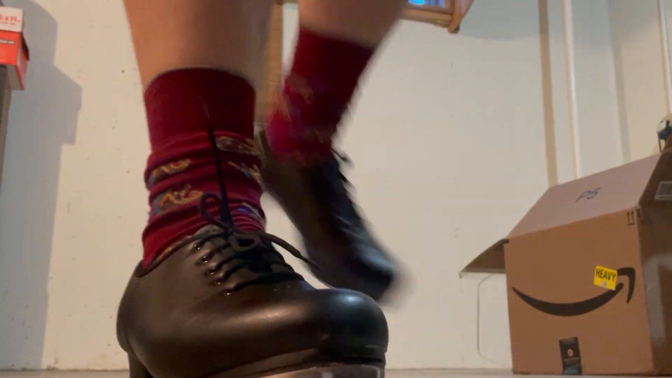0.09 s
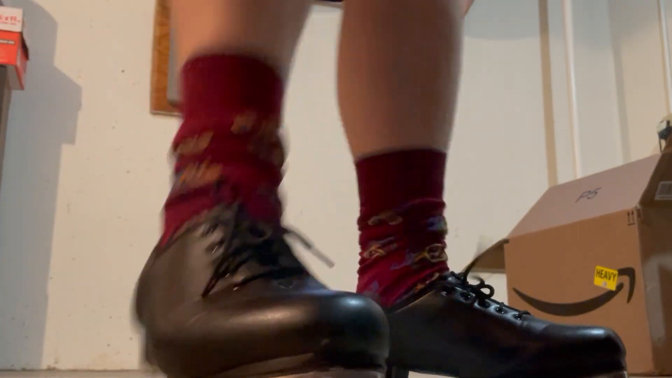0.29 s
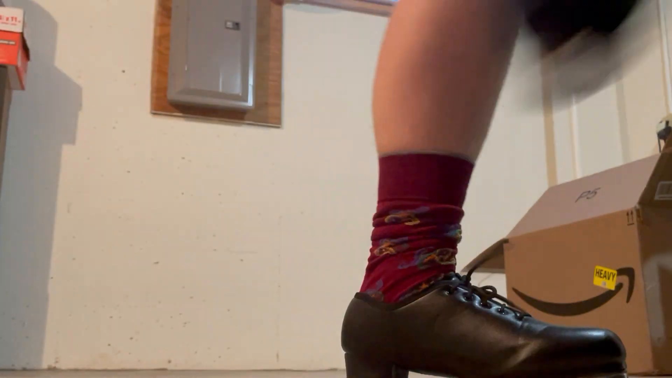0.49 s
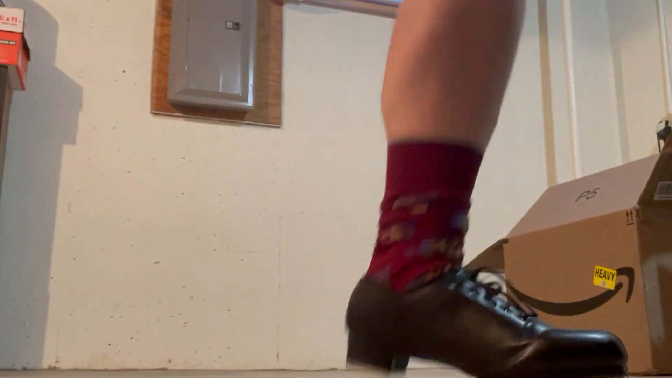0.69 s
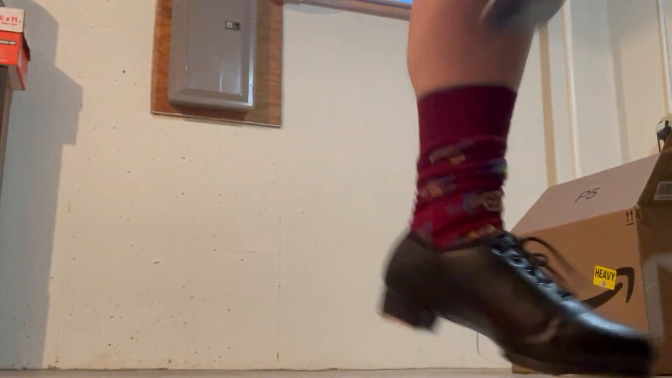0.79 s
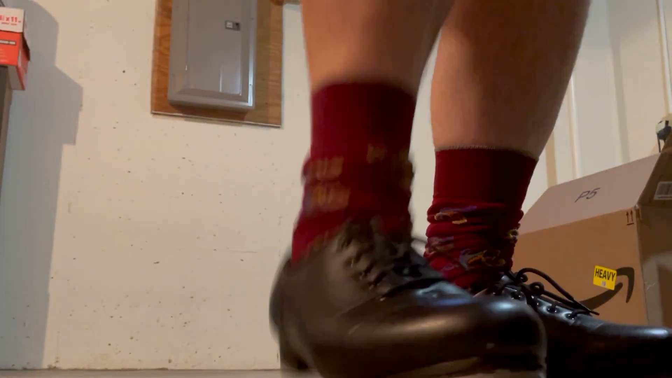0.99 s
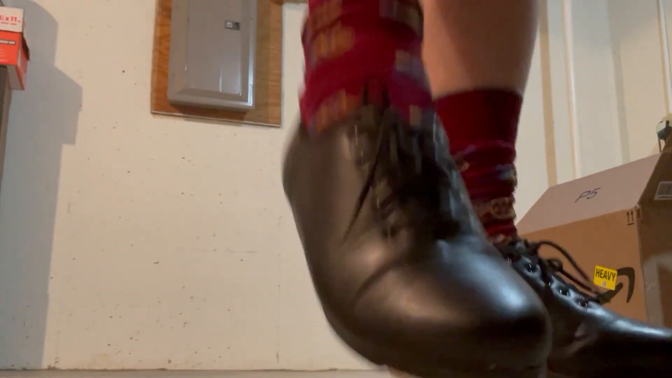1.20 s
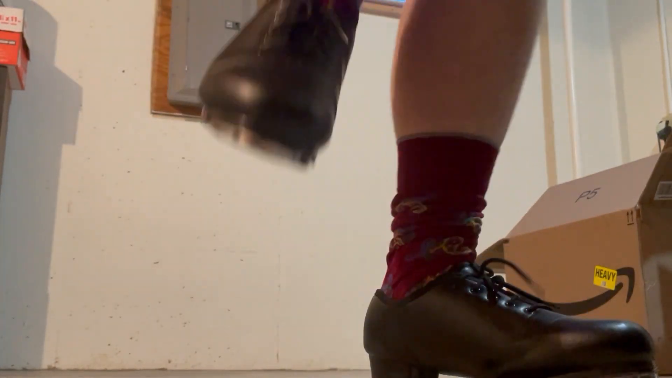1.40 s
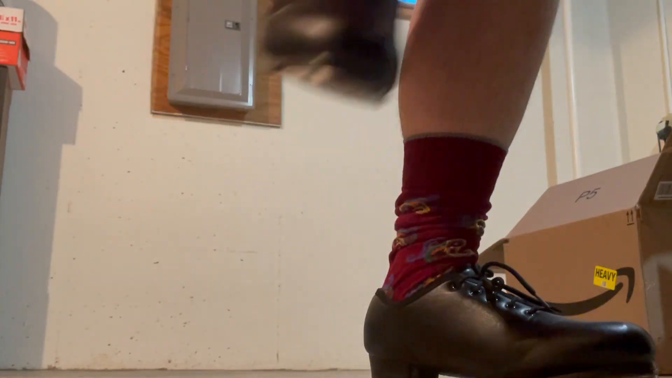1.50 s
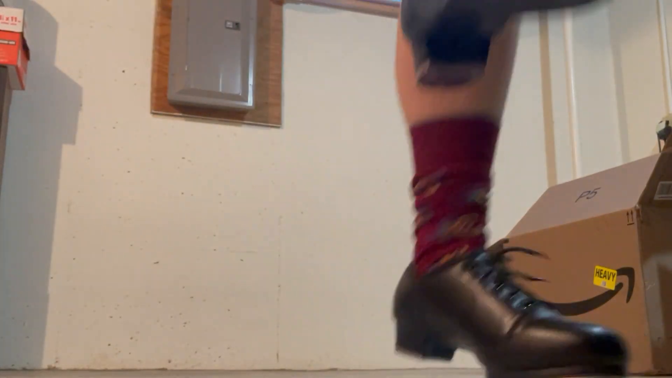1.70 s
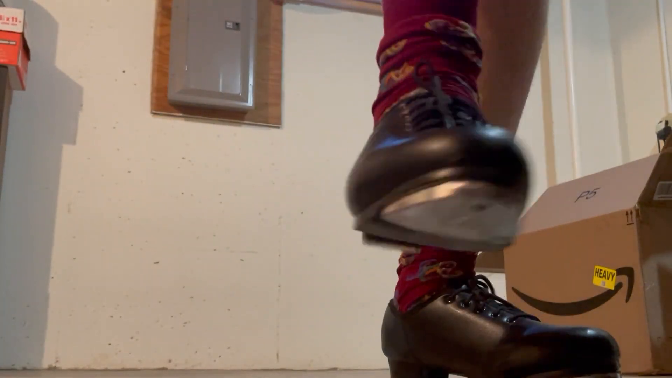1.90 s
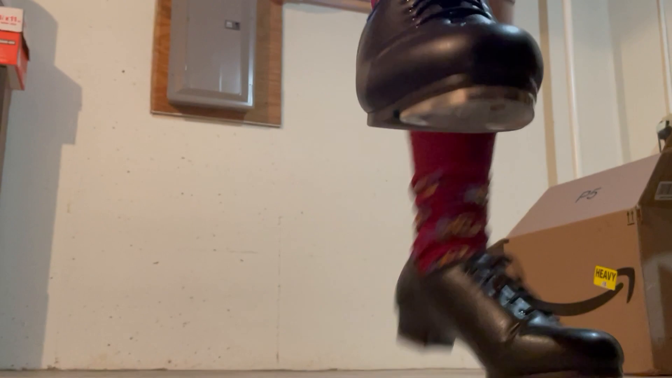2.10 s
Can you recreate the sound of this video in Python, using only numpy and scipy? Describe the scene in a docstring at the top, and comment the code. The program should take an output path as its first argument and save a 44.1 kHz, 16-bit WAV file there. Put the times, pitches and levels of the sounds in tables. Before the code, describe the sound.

A metal-tapped dance shoe hits a hard floor close to the microphone: a quick double knock, a pause, then more clacks with gritty scrapes between. A bare room rings briefly after each; faint background air.

```python
"""Tap shoe on a basement floor

Steel taps under a dance shoe knock, bounce and scrape on a hard floor near a phone lying on it.
Each contact rings the short tones of tap and sole and thuds the slab; faint shuffles fill some gaps.
The bare room answers after a gap with fading noise, and its lowest tones hum on.
The phone's two ports drift apart in phase towards the treble."""
import sys
import numpy as np
from scipy import signal
from scipy.fft import rfft, irfft
from scipy.io import wavfile
from scipy.ndimage import uniform_filter1d

SR = 44100
rng = np.random.default_rng(int(sys.argv[2]) if len(sys.argv) > 2 else 0)


def generate_wav(signal):
    """Clip the signal to [-1, 1] and save it as 16-bit WAV at the path in sys.argv[1]."""
    frames = np.transpose(np.atleast_2d(signal))
    scaled = np.clip(frames, -1, 1) * 32767
    pcm = np.round(scaled).astype(np.int16)
    wavfile.write(sys.argv[1], SR, pcm)


def elevation(decibels):
    """Turn decibel levels (scalar or array-like) into linear amplitude ratios."""
    levels = np.asarray(decibels, float)
    return 10 ** (levels / 20)


N = 92610
FREQ = np.fft.rfftfreq(N, 1 / SR) + 1e-3  # Hz, just above zero so that its logarithm exists

# natural tones (modes) of tap and sole: [f/Hz, relative level/dB, time to fall by 60 dB t60/s]
SHOE_MODES = [(660, -7.5, 0.0064), (922, -28.5, 0.009), (1200, 1.5, 0.013), (1454, -2.5, 0.016),
              (1890, -5, 0.0085), (2100, -15, 0.022), (2273, 2.5, 0.0071), (2848, 5.5, 0.0074),
              (3500, 8, 0.0068), (4080, 5, 0.013), (4866, 1.5, 0.0093), (5390, 5, 0.0039),
              (7780, 4.5, 0.0035)]
# colour of the bright crack and of the grit hiss: [f/Hz, relative level/dB]
BRIGHT_COLOUR = [(1500, -4.5), (4000, 1), (7000, 6), (10500, -1.5), (13000, -8.5), (15000, -2.5),
                 (16000, -19), (16600, -38)]
FAR_MODES_DB = -15  # share that every shoe mode gets, however far from the contact's centre
CLICK_FROM_HZ = 375  # shoe sounds are thinned out below this


def ring(hz, t60, t):
    """A struck tone: a sine that falls by 60 dB in t60 seconds."""
    return np.sin(2 * np.pi * hz * t) * np.exp(-np.log(1000) * t / t60)


def table(rows, log=True):
    """Reads a table of (Hz, value) at every frequency bin, on a logarithmic pitch scale if log is set."""
    hz, value = np.array(rows, float).T
    if log:
        return np.interp(np.log(FREQ), np.log(hz + 1), value)
    return np.interp(FREQ, hz, value)


def coloured(rows):
    """Noise of rms 1 whose spectrum follows a table of (Hz, dB)."""
    spectrum = rfft(rng.standard_normal(N)) * elevation(table(rows))
    noise = irfft(spectrum, N)
    return noise / np.std(noise)


def curve(rows, col, outside):
    """Reads one column of a time table at every sample, with a fixed value before and after it."""
    rows = np.array(rows, float)
    return np.interp(np.arange(N) / SR, rows[:, 0], rows[:, col], left=outside, right=outside)


def remove_bass(x):
    """Takes away the part below the clicks with a high-pass filter."""
    return signal.sosfilt(signal.butter(2, CLICK_FROM_HZ, "high", fs=SR, output="sos"), x)


def still_air():
    """Steady faint noise, mostly alike in both channels, with a smaller part of opposite sign."""
    # colour of the background: [f/Hz, relative level/dB]
    air_colour = [(24, -28.5), (40, 0), (112, -4), (181, -21), (461, -10.5), (782, -25), (1840, -12.5),
                  (2040, -8), (2490, -21), (15300, -26.5), (16500, -35)]
    alike = coloured(air_colour)
    opposite = 0.35 * coloured(air_colour) * np.array([[1], [-1]])
    return elevation(-65) * (alike + opposite)


def shuffles():
    """Soft shuffles of cloth and weight: faint noise rustle, with a dull low noise as weight shifts."""
    # one list per shuffle: [t/s, relative level/dB, low part against the rustle/dB]
    shuffle_curves = [
        [(0.0, -57, -38), (0.03, -55, -25), (0.05, -63, -9), (0.076, -61.5, -31.5), (0.086, -68, -8),
         (0.134, -73, 8.5), (0.15, -92, 20), (0.2, -84, 22.5)],
        [(0.64, -78, 3), (0.688, -71, -21), (0.694, -63, -5.5), (0.726, -66.5, -38), (0.754, -76, -18),
         (0.768, -87, 19), (0.79, -55, 3.5), (0.86, -61, -16)],
        [(1.56, -102, -15), (1.598, -52.5, -46.5), (1.61, -82.5, -18), (1.636, -75.5, -21), (1.654, -66, -23),
         (1.664, -67, -10), (1.68, -52, -0.5)],
    ]
    # colour of the rustle: [f/Hz, relative level/dB]
    rustle_colour = [(300, 30), (800, -17.5), (1200, -25.5), (2300, 21.5), (4000, 10), (7000, -25),
                     (11000, -26), (15500, -26), (16400, -36)]
    # colour of the low part: [f/Hz, relative level/dB]
    low_colour = [(60, -9), (120, -3), (220, 0), (400, 2.5), (700, -9), (1500, -37)]
    rustle, low = coloured(rustle_colour), coloured(low_colour)
    out = np.zeros(N)
    for rows in shuffle_curves:
        loudness = elevation(curve(rows, 1, outside=-200) - 3.5)
        low_share = elevation(curve(rows, 2, outside=-200))
        out += loudness * (rustle + low_share * low)
    return out


def contacts(rows):
    """Brief chatter rings shoe modes near a centre, plus crack and slab thud; row two goes to the walls."""
    chatter_s, crack_s, crack_level_db = .00012, 0.0013, -11.5
    scatter_db, detune = 2.2, .015  # chance spread of mode level, and of mode pitch as a fraction
    thud_hz, thud_t60_s, thud_level_db = 356.4, 0.0056, 1
    echo_ring_share = .25  # modes sent to the walls ring for this fraction of their time
    out = np.zeros((2, N + SR))
    t = np.arange(SR // 20) / SR
    hz, db, t60 = np.array(SHOE_MODES, float).T[:, :, None]
    sign = (-1.) ** np.arange(len(SHOE_MODES))[:, None]  # neighbouring modes start in opposite directions
    hiss = coloured(BRIGHT_COLOUR)
    for at, contact_db, centre_hz, octaves, thud_db, crack_db, echo_db in rows:
        i = int(at * SR)
        level_chance, pitch_chance = rng.standard_normal((2, len(SHOE_MODES), 1))
        chatter = (1 + rng.standard_normal(len(t))) * np.exp(-t / chatter_s)
        distance = np.log2(hz / centre_hz) / max(octaves, .1)
        near = elevation(FAR_MODES_DB) + np.exp(-.5 * distance ** 2)
        strength = sign * near * elevation(db + scatter_db * level_chance)
        mode_hz = hz * (1 + detune * pitch_chance)
        crack = elevation(crack_level_db + crack_db) * np.resize(hiss[i:], len(t)) * np.exp(-t / crack_s)
        for k, share in enumerate((1, echo_ring_share)):
            body = np.sum(strength * ring(mode_hz, t60 * share, t), axis=0)
            click = remove_bass(signal.fftconvolve(body, chatter)[:len(t)])
            click *= 0.067 / np.sqrt(np.mean(click ** 2))  # same rms for every click before its own level
            out[k, i:i + len(t)] += elevation(contact_db + k * echo_db) * (click + crack)
        thud = ring(thud_hz, thud_t60_s, t)
        out[0, i:i + len(t)] += elevation(contact_db + thud_db + thud_level_db) * thud
    return out[:, :N]


def room(x):
    """The room's answer: a noise tail builds after a gap and dies band by band, with early wall echoes."""
    # the tail by band: [f/Hz, t60/s, relative level/dB, share of opposite sign in left and right]
    tail_bands = [(88, 0.39, -8, 0.16), (167, 0.52, -6.5, 0.27), (378, 0.59, -9.5, 1),
                  (690, 0.51, -11.5, 0.19), (1400, 0.53, -3, 0.82), (2800, 0.49, -5, 0.25),
                  (4500, 0.43, -6, 0.21), (7560, 0.34, -3, 0.13), (10450, 0.27, -7.5, 0.28),
                  (15000, .18, -14, 0.21)]
    # first strong reflections: [delay/s, level/dB]
    wall_echoes = [(0.0149, -16.5), (0.0215, -18.5), (0.036, -22)]
    gap_s, build_s, tail_db, echo_smear_s = .005, .008, -2, 0.0035
    t = np.arange(N) / SR
    late = np.maximum(t - gap_s, 0)
    centres = np.log([row[0] for row in tail_bands])
    tail = np.zeros((2, N))
    for k, (hz, t60, db, unlike) in enumerate(tail_bands):
        # each band fades into its neighbours
        band = np.interp(np.log(FREQ), centres, np.arange(len(tail_bands)) == k) ** .5
        same, other = irfft(rfft(rng.standard_normal((2, N))) * band, N)
        build = 1 - np.exp(-late / build_s)
        decay = np.exp(-np.log(1000) * late / t60)
        shape = build * decay * np.sqrt(14 / t60 / SR)  # the root evens out short and long tails
        tail += elevation(db + tail_db) * shape * (same + unlike * other * np.array([[1], [-1]]))
    for delay_s, db in wall_echoes:
        after = np.maximum(t - delay_s, 0)
        smear = rng.standard_normal(N) * np.exp(-after / echo_smear_s) * (after > 0)
        tail += elevation(db) * smear / np.sqrt(np.sum(smear ** 2))
    return signal.fftconvolve(x[None], tail, axes=1)[:, :N]


def boom():
    """Landings set low room modes ringing with a soft start; row two is their dull push on the air."""
    # lowest room modes: [f/Hz, relative level/dB, t60/s]
    room_modes = [(49.7, -35.5, 0.28), (66.1, -39.5, 0.56), (58, -46.5, 1.75), (138.8, -41.5, .3),
                  (279.3, -51, .7)]
    # heavy landings: [t/s, level of modes one to three/dB, of mode four/dB, of mode five/dB, push/dB]
    landings = [(.243, -5.5, 6, 3.5, -15.5), (0.889, -10, -8, 5, -26), (0.975, -12, -26, -18, -31),
                (1.303, 0.5, 2, -14.5, -25), (1.761, 5.5, 5, -22, -16)]
    push_s, swell_s = 0.00092, 0.0086  # time to the push's peak, and of the soft start
    out = np.zeros((2, N))
    for at, hum_db, fourth_db, fifth_db, push_db in landings:
        t = np.maximum(np.arange(N) / SR - at, 0)
        swell = 1 - np.exp(-t / swell_s)
        blows_db = (hum_db, hum_db, hum_db, fourth_db, fifth_db)
        for k, ((hz, db, t60), blow_db) in enumerate(zip(room_modes, blows_db)):
            out[0] += (-1) ** k * elevation(db + blow_db) * ring(hz, t60, t) * swell
        out[1] += elevation(push_db) * t / push_s * np.exp(1 - t / push_s)
    return out


def slides():
    """The sole slides over grit: dense clicks ring shoe modes near a moving centre, with a bright hiss."""
    # one list per slide: [t/s, relative level/dB, centre of the ringing modes f/Hz]
    slide_curves = [
        [(.955, -52, 3070), (.965, -38, 3000), (.973, -16, 3000)],
        [(.983, -30.5, 3500), (1.089, -44, 3100), (1.113, -42.5, 3100), (1.191, -44, 2800), (1.225, -55, 2960)],
        [(1.228, -49, 2100), (1.246, -29.5, 1830), (1.262, -29, 1240), (1.278, -32.5, 1710), (1.29, -51, 2000)],
        [(1.68, -53.5, 1800), (1.708, -34.5, 1500), (1.728, -31.5, 1400), (1.752, -26, 1200)],
    ]
    slide_db, hiss_db = -8.5, -2.5
    grit_per_s, grit_spread_db, spread_octaves = 2200, 3.5, 0.6
    t = np.arange(SR // 20) / SR
    grain = uniform_filter1d(rng.exponential(size=N) ** 2, size=40)  # makes the hiss uneven
    out = elevation(hiss_db) * coloured(BRIGHT_COLOUR) * grain / np.sqrt(np.mean(grain ** 2))
    loudness = sum(elevation(curve(rows, 1, outside=-200) + slide_db) for rows in slide_curves)
    all_rows = [row for rows in slide_curves for row in rows]
    centre_hz = curve(all_rows, 2, outside=3000)
    for hz, db, t60 in SHOE_MODES:
        hits = rng.random(N) < grit_per_s / SR
        grit = hits * rng.standard_normal(N) * elevation(grit_spread_db * rng.standard_normal(N))
        rung = signal.fftconvolve(grit, ring(hz, t60, t))[:N]
        distance = np.log2(hz / centre_hz) / spread_octaves
        near = elevation(FAR_MODES_DB) + np.exp(-.5 * distance ** 2)
        out += near * elevation(db) * rung / np.std(rung) / 2
    return remove_bass(out) * uniform_filter1d(loudness, size=200)


def scene():
    """Adds up the shoe, its grit and shuffles, the room's answer and hum, and the still air."""
    # contacts of tap on floor: [t/s, relative level/dB, centre of the ringing modes f/Hz, spread/octaves,
    # thud against the contact/dB, crack against the click/dB, part sent to the walls against the contact/dB]
    taps = [(.2294, -4, 1077, 1.3, -40, 1, -1), (.2325, -12.5, 1000, 0.72, -17.5, -1, -5),
            (.2370, -16.5, 1200, 0.39, -10.5, -12, -13.5), (.2412, -1, 2080, 0.5, -10, 2.5, -3),
            (.2427, -7, 1300, 0.39, -10, 2, -3), (.2440, -2.5, 4024, 0.34, -21, 3, 6),
            (.2510, -11.5, 4114, 0.88, -12, 2, -15), (.2545, -13.5, 4500, .8, -23, 4, -6),
            (.8757, -17, 3980, 1.1, -29, -7, -12), (.8821, 3, 4080, 0.13, -32, -6, -3),
            (.8860, -5, 2370, 0.55, -23, 1, -2), (.8880, -14.5, 1200, 1, -0.5, -17.5, 3.5),
            (.9743, -8, 3500, 0.47, -10, 5.5, -24), (.9762, -9.5, 1100, 1.34, 3.5, -4, -22),
            (.9783, -13.5, 3050, 0.33, -45, -5.5, 9), (.9913, -14, 5150, 0.69, -19, 4, -11),
            (1.0347, -15, 3500, 0.37, -32, 2, -8), (1.3012, -6, 3056, 0.35, -45, 2.5, 3.5),
            (1.3042, -9.5, 1200, 0.79, -17, 3.5, -4.5), (1.7597, -2, 1200, 0.55, -20.5, 2, -23),
            (1.7622, -3.5, 2200, 1.6, -29, 2.5, 5.5)]
    # faint ticks of a loose tap or leather, with the same columns: [t/s, relative level/dB, centre f/Hz,
    # spread/octaves, thud/dB, crack/dB, part sent to the walls/dB]
    ticks = [(0.104, -46, 1050, 0.67, -29, -6, 9.5), (0.126, -42.5, 1170, 0.43, -23, -7, -17),
             (0.662, -62, 2090, 1.46, -34, 8, 6), (0.698, -42.5, 2730, 0.58, -46, 7.5, 8),
             (0.719, -45, 2800, 0.6, -26, 6, 3), (0.788, -48.5, 3450, 1.1, -11, 7, 21.5),
             (0.797, -53, 2190, 1.45, 8, 7, 0), (0.809, -42.5, 2130, 1.1, -3, -1, 9),
             (1.578, -43, 2730, 0.4, -30, -6, 8), (1.592, -36.5, 2770, 1.2, -35, 4, 4),
             (2.038, -46, 3420, 0.7, -32.5, -4.5, 7), (2.058, -34, 2640, 0.4, -20, -3, 3.5)]
    air, rustle = still_air(), shuffles()
    shoe, outward = contacts(taps) + contacts(ticks)
    hum, push = boom()
    grit = slides()
    answer = room(outward + push + elevation(4.5) * grit)  # grit reaches the walls 4.5 dB up
    return shoe + grit + rustle + answer + hum + air


def low_pass(x):
    """Removes everything above the highest recorded frequency."""
    return signal.sosfilt(signal.butter(12, 17150, fs=SR, output="sos"), x)


def record(dry):
    """Two ports differ in level and, more and more with pitch, in phase; loud peaks round off."""
    # phase gap between the ports: [f/Hz, phase/rad]
    port_phase = [(0, .35), (600, .45), (1400, .9), (2400, .55), (5000, .4), (7150, 1.2), (8600, 3.14),
                  (11300, 7.2), (12000, 8.6), (12900, 9.42), (13600, 10.4), (14500, 12.4), (16700, 13.2)]
    # level of the first port against the second: [f/Hz, level/dB]
    port_balance = [(60, -2.5), (400, -3.5), (1300, -2.5), (2400, -1), (4400, 0), (15000, -.3)]
    # each port takes half of the difference, in opposite directions
    half = elevation(table(port_balance) / 2) * np.exp(.5j * table(port_phase, log=False))
    low_cut = FREQ ** 4 / (FREQ ** 4 + 40.6 ** 4)
    high_cut = 1 / (1 + (FREQ / 16600.) ** 40)
    x = irfft(rfft(dry) * low_cut * high_cut * np.array([half, 1 / half]), N)
    x = .97 * np.tanh(x / .97) + .1 * x
    return low_pass(x)


dry = scene()
out = record(dry)
generate_wav(out)
```